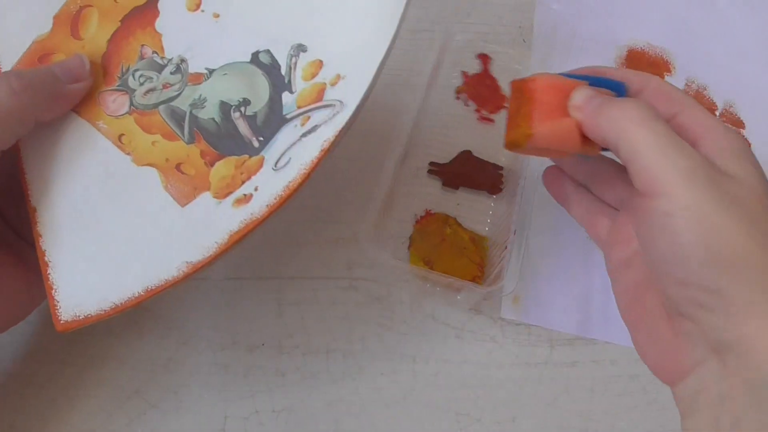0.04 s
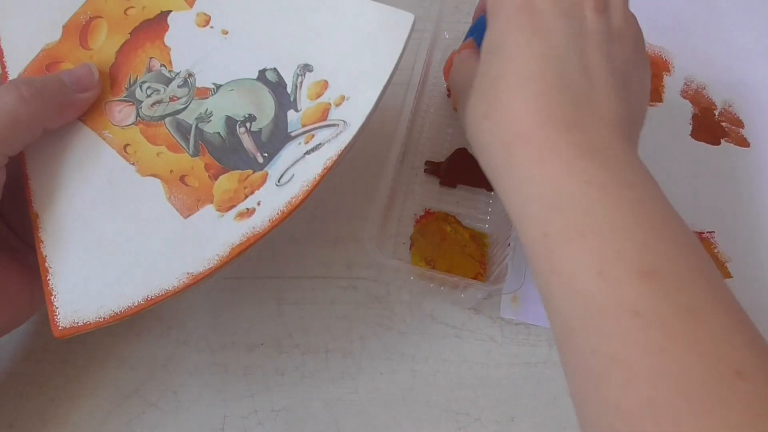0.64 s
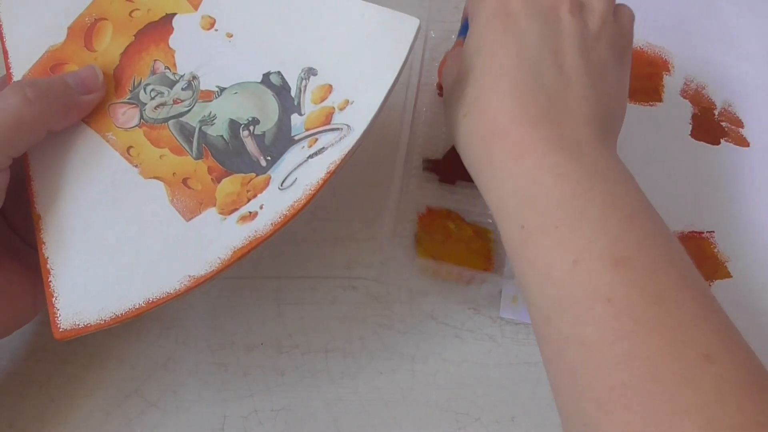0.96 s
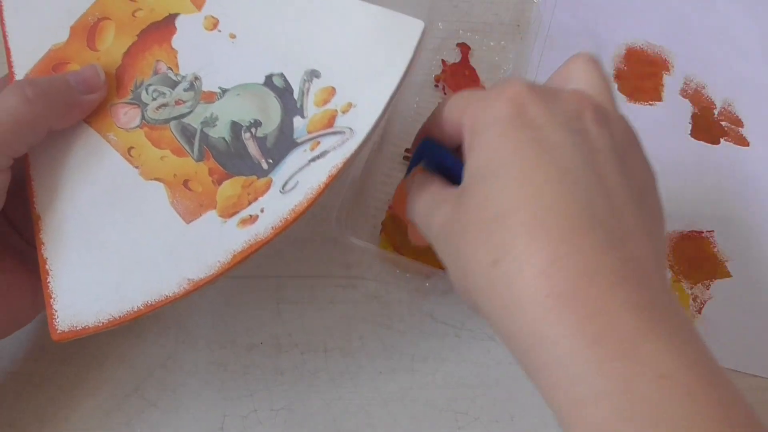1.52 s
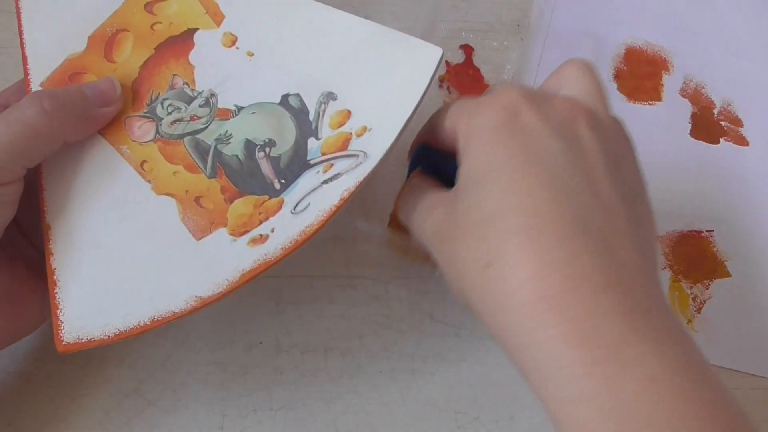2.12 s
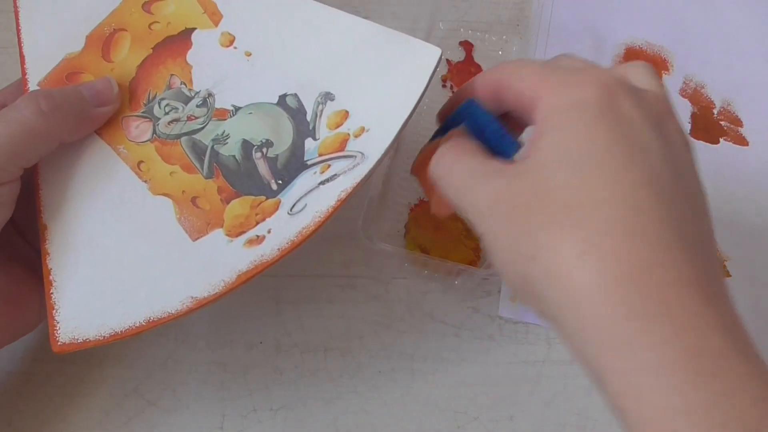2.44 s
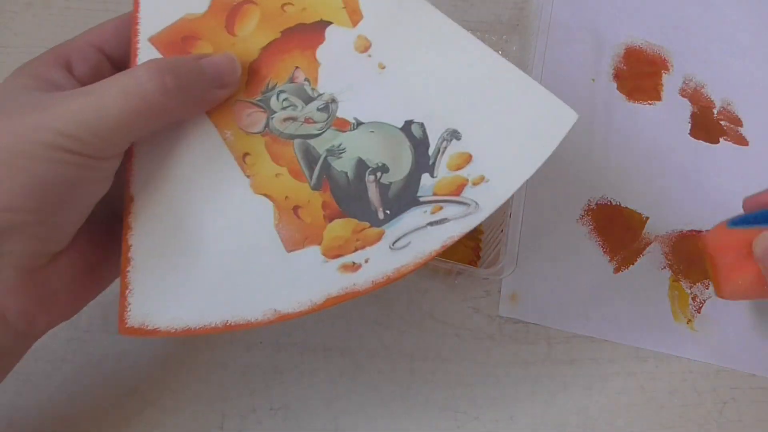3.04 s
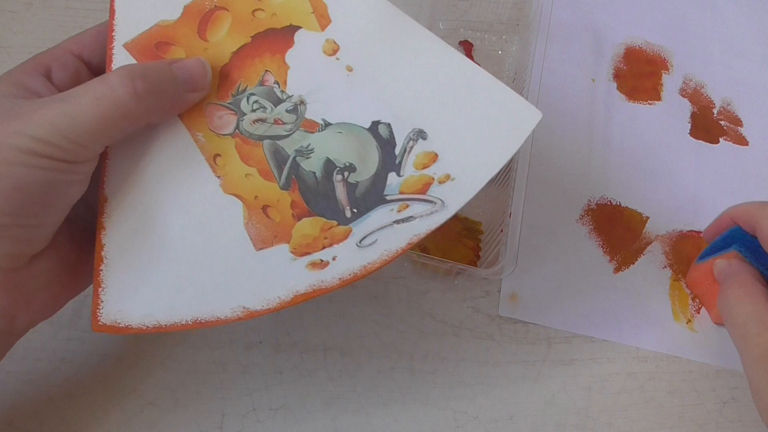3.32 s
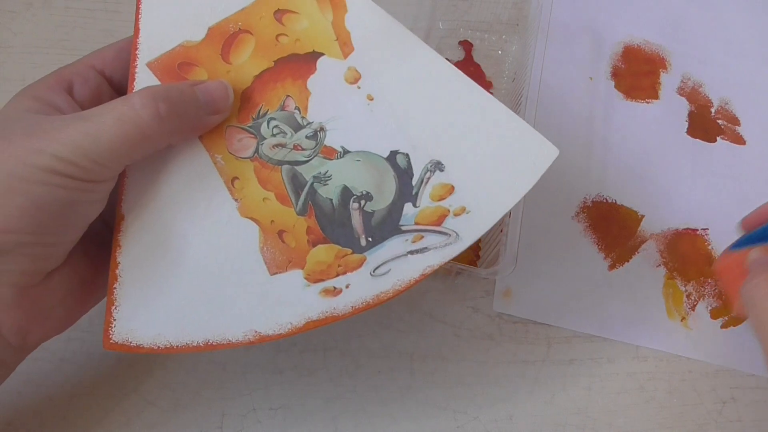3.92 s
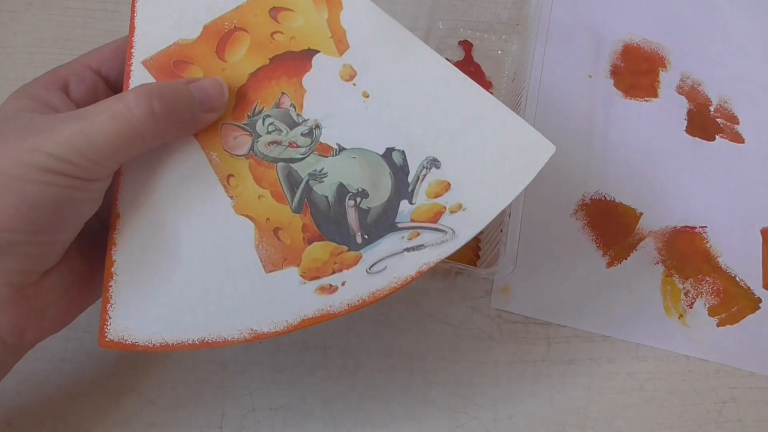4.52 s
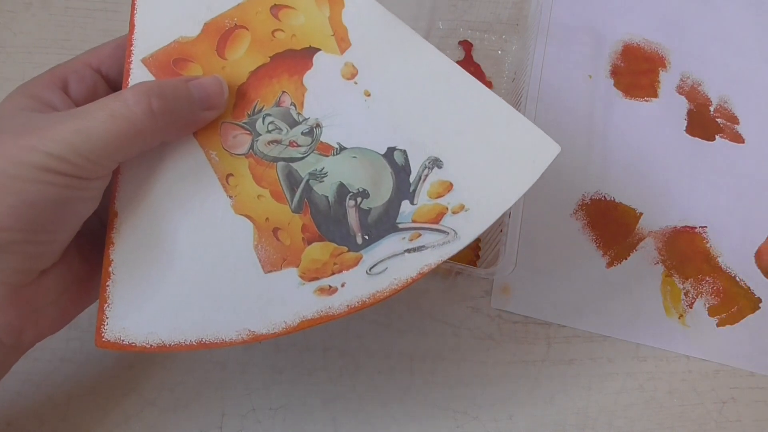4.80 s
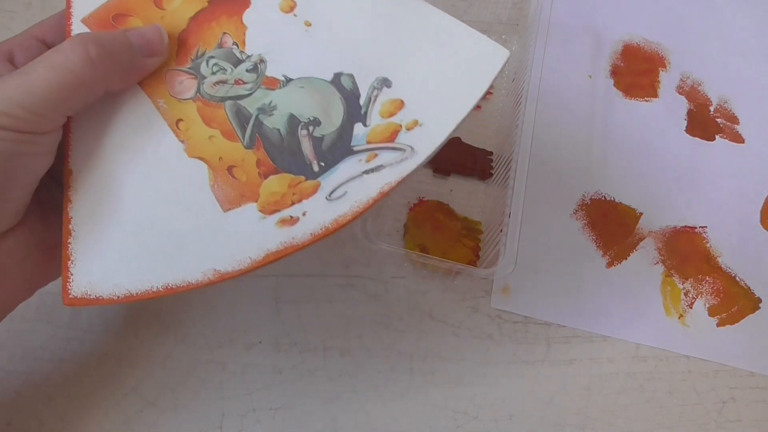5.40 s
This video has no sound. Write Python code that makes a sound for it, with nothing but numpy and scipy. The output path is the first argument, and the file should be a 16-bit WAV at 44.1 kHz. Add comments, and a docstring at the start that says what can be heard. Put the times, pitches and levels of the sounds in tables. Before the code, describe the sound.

Thin plastic crackles and knocks on a table as a sponge picks up paint, followed by faint dabs and wipes on paper.

```python
"""First a foam sponge picks up paint from a thin plastic tray on a table, its cells rustling at each press.
The sticky foam lifts the tray, which crackles and knocks back down, ringing in its normal modes.
Then the sponge is dabbed and wiped on a sheet of paper: the table thuds and threads of wet paint snap.
Throughout, a small room reverberates over a faint wavering hum; early on, a lens motor ticks."""
import sys
import numpy as np
from scipy import signal
from scipy.fft import rfft, irfft
from scipy.io import wavfile
from scipy.ndimage import uniform_filter1d

SR = 44100
rng = np.random.default_rng(int(sys.argv[2]) if len(sys.argv) > 2 else 0)


def bounce(signal):
    """Save signal as a 16-bit WAV file at the path given by the first command-line argument."""
    frames = np.transpose(np.atleast_2d(signal))
    limited = np.clip(frames, -1, 1)
    pcm = np.round(limited * 32767).astype(np.int16)
    wavfile.write(sys.argv[1], SR, pcm)


N = 245178
TIME = np.arange(N) / SR
EVENT_N = SR * 2 // 5
AGE = np.arange(EVENT_N) / SR  # time within one event


# The tray buckles or hits the table; the row at 1.704 s is a soft press that only sets the tray ringing, its
# crack near silent: # t/s, body level/dB, body centre f/Hz, crack level/dB, crack cutoff f/Hz, crack T60/s,
# rebound gain/dB
TRAY_KNOCKS = [(0.6233, -48, 200, -36, 12000, 0.027, -8), (0.6915, -40, 560, -34, 9000, 0.02, -2.5),
               (1.0297, -28.5, 560, -27, 12000, 0.036, -22),
               (1.0485, -30.5, 830, -21.5, 8000, 0.022, -26.5),
               (1.109, -24.5, 930, -15.5, 5260, 0.023, -16.5), (1.19, -31.5, 830, -35.5, 6000, 0.066, -16),
               (1.2227, -21.5, 850, -23.5, 11200, 0.039, -15.5), (1.2603, -30, 750, -29, 7700, 0.044, -11),
               (1.704, -38.5, 557, -60, 9000, .05, -20), (1.925, -28, 770, -31, 12400, 0.074, -9.5),
               (2.107, -31, 760, -30.5, 12100, 0.068, -1.5), (2.3512, -21.5, 960, -16, 13000, 0.027, -12),
               (2.363, -24, 1010, -28, 10000, 0.028, -11)]
# Normal modes of the tray on the table: f/Hz, relative level/dB, T60/s
TRAY_RESONANCES = [(189, -15, 0.13), (222.6, -1.5, 0.44), (416, -5.5, 0.35), (486.6, -5.5, 0.21),
                   (577.5, -0.5, 0.22), (605, -6, 0.32), (663, -8, 0.29), (720.4, -0.5, 0.23),
                   (750.7, -10.5, .22), (774, -1, 0.23), (839, -7, 0.22), (921, -5.5, 0.1),
                   (998, -15.5, 0.16), (1032, 1, 0.13), (1087, -9, 0.4), (1190, -8.5, 0.3),
                   (1200, -9.5, 0.34), (1284, -4.5, 0.23), (1350, -20.5, 0.21), (1386, -3, 0.23),
                   (1446, -5.5, 0.28)]
# Spectra of a surface's densely overlapping modes and of the crack: f/Hz, relative level/dB
BODY_SPECTRUM = [(30, -36.5), (90, -26), (135, -19), (230, -9.5), (300, -10.5), (480, -1.5), (750, -3.5),
                 (1400, -2), (1750, -14), (2400, -16), (4000, -20), (7000, -40.5), (16000, -46)]
CRACK_SPECTRUM = [(60, -21), (200, -24.5), (800, 6.5), (1400, -12), (2000, 1), (2700, -4.5), (3600, 4),
                  (5200, 3.5), (6600, -0.5), (8800, 5.5), (10500, -0.5), (13000, 2), (16000, -32.5)]

def tray_knocks(rebound_s=0.018, buckle_s=0.00044, swell_s=0.00082, room_t60=0.29, falloff_db=7.5):
    """Impulse excitation: each knock and rebound gives a crack, its dull echo and the tray's ringing."""
    out = np.zeros((2, N))
    for start, body_db, centre_hz, crack_db, top_hz, t60, rebound_db in TRAY_KNOCKS:
        for delay, gain_db in [(0, 0), (rebound_s, rebound_db)]:
            crack = colour(noise(EVENT_N, side_db=-10.5), CRACK_SPECTRUM, top_hz=top_hz)
            crack *= attack_decay(buckle_s, t60)
            echo = noise(EVENT_N, side_db=-2, grain_db=3.5)
            echo = colour(echo, CRACK_SPECTRUM, tilt_db=-3.4, top_hz=top_hz) * fade(AGE, room_t60)
            snap = crack + undb(-4) * np.sqrt(t60 / room_t60) * echo
            # The place of contact favours the modes near one frequency.
            modes = [(hz, db - falloff_db * abs(np.log2(hz / centre_hz)), decay)
                     for hz, db, decay in TRAY_RESONANCES]
            dense = colour(noise(EVENT_N, side_db=-6), BODY_SPECTRUM) * fade(AGE, t60=0.3)
            body = (undb(-1) * modal_response(modes) + undb(-4.5) * dense) * (1 - np.exp(-AGE / swell_s))
            add(out, start + delay, undb(gain_db) * (undb(crack_db) * snap + undb(body_db) * body))
    return out


def foam_rustle(strokes, spectrum, modes, side_db, grain_db, modes_db, dense_db):
    """Forced vibration: foam cells slip and rustle under pressure, driving the surface below."""
    out = np.zeros((2, N))
    surface = modal_response(modes, scatter_db=-1)
    for crest, rise, t60, rustle_db, tilt_db, body_db in strokes:
        slips = attack_decay(rise, t60) * undb(2.5 * wander(EVENT_N, rate_hz=320))
        cells = slips * colour(noise(EVENT_N, side_db, grain_db), spectrum, tilt_db)
        force = slips * colour(noise(EVENT_N, side_db, grain_db), BODY_SPECTRUM)
        ringing = signal.fftconvolve(force.mean(axis=0, keepdims=True), surface, axes=1)[:, :EVENT_N]
        body = undb(dense_db) * force + undb(modes_db) * np.std(force) * unit(ringing)
        add(out, crest - rise, undb(rustle_db) * cells + undb(body_db) * body)
    return out


# The foam is squeezed in the tray:
# crest t/s, rise time/s, T60/s, rustle level/dB, tilt/(dB/octave), body level/dB, peel level/dB
TRAY_PRESSES = [(0.1245, 0.0031, 0.19, -42.5, 1, -44, -73), (0.15, .02, 0.24, -34, -1, -41.5, -63),
                (0.655, 0.024, 0.25, -49.5, -2.5, -48.5, -62), (0.70, .02, 0.18, -45, -4.5, -48, -59),
                (0.92, 0.015, 0.16, -42.5, 1.5, -46.5, -50), (0.963, .025, 0.073, -47.5, -3.5, -45, -42),
                (1.165, 0.021, 0.32, -53, 7, -36.5, -58.5), (1.558, 0.023, 0.66, -63.5, -0.5, -55, -56),
                (1.706, 0.024, .14, -41, -3, -43.5, -50), (1.932, 0.013, 0.12, -34, -3, -30, -51.5),
                (2.116, 0.015, 0.078, -35, -3, -31, -45.5), (2.248, 0.025, 0.3, -53, -2, -57, -54.5)]

def tray_presses(peel_delay_s=0.089, peel_rise_s=0.028, peel_t60=0.33, peel_tilt_db=-0.7):
    """Adhesion: after each press into the paint, the foam rustles again as it peels away."""
    strokes = []
    for crest, rise, t60, rustle_db, tilt_db, body_db, peel_db in TRAY_PRESSES:
        strokes.append((crest, rise, t60, rustle_db, tilt_db, body_db))
        strokes.append((crest + peel_delay_s, peel_rise_s, peel_t60, peel_db, peel_tilt_db, peel_db + 1.5))
    return foam_on_tray(strokes)


# Spectrum of foam rustling in the tray: f/Hz, relative level/dB
FOAM_SPECTRUM = [(60, -24), (200, -9), (1200, -14), (2000, -5), (2700, -9.5), (3800, 0), (5200, -1),
                 (6600, -2), (9000, -0.5), (10500, -4), (13000, -5.5), (16000, -26)]

def foam_on_tray(strokes):
    """Sounding-board action: the thin tray radiates the slips of the foam."""
    return foam_rustle(strokes, FOAM_SPECTRUM, TRAY_RESONANCES,
                       side_db=-9, grain_db=2.5, modes_db=-8, dense_db=-4.5)


# Hand or foam lands on the paper:
# crest t/s, rise time/s, T60/s, rustle level/dB, tilt/(dB/octave), thud level/dB
PAPER_DABS = [(3.263, 0.0034, 0.21, -64, -18, -43), (3.364, 0.0022, 0.17, -59, 1, -55),
              (3.422, 0.049, 0.2, -57, 2.5, -68), (3.496, .007, 0.19, -44, -1, -45),
              (3.74, 0.0079, 0.16, -55.5, 3.5, -65.5), (3.807, 0.0071, 0.17, -50.5, 4.5, -62),
              (3.95, 0.0036, 0.1, -57.5, 4.5, -81), (4.025, 0.032, 0.086, -52.5, 4, -80),
              (4.147, .007, 0.15, -56, 5, -59.5), (4.225, 0.014, 0.12, -50, 5.5, -71),
              (4.302, 0.0074, 0.092, -48.5, 3.5, -53.5), (4.352, .009, 0.043, -62, 7, -55.5),
              (4.441, 0.0036, 0.095, -60, 1, -59), (4.477, 0.007, .056, -42.5, -1, -40.5),
              (4.764, 0.0067, 0.028, -51, -4.5, -59), (5.381, 0.0055, 0.22, -55.5, -3, -48),
              (5.408, .026, 0.13, -49, -1, -50.5)]
# Spectrum of foam on paper: f/Hz, relative level/dB
PAPER_SPECTRUM = [(200, -33), (1200, -3.5), (2500, -4), (3800, 1), (6000, -2), (9000, -2), (11000, -5.5),
                  (13000, -7), (16000, -42)]
# Normal modes of the table top: f/Hz, relative level/dB, T60/s
TABLE_RESONANCES = [(161, -18, 0.059), (252, 5, 0.064), (426, 2, 0.034), (544, -8.5, 0.032),
                    (763, 13.5, 0.01), (930, -2, 0.033), (1200, -1, 0.014)]

def paper_dabs():
    """Damping: the table's modes die quickly, so each dab is a rustle over a thud."""
    return foam_rustle(PAPER_DABS, PAPER_SPECTRUM, TABLE_RESONANCES,
                       side_db=-3, grain_db=3, modes_db=-3.5, dense_db=-8.5)


# Envelope of the foam rubbing along the paper: t/s, level/dB
WIPE_ENVELOPE = [(4.33, -71), (4.46, -65), (4.5, -54.5), (4.585, -67.5), (4.655, -60), (4.745, -54.5),
                 (4.79, -69.5), (4.86, -60.5), (4.93, -71), (5.03, -58), (5.14, -65), (5.185, -78),
                 (5.25, -60.5), (5.35, -83)]

def paper_wipe():
    """Stick-slip friction: foam cells catch on the paper and faintly shake the table."""
    times, db = np.transpose(WIPE_ENVELOPE)
    touching = (TIME > times[0]) * (TIME < times[-1])
    slips = touching * undb(np.interp(TIME, times, db) + 2.5 * wander(N, rate_hz=320))
    cells = colour(noise(N, side_db=-1.5, grain_db=3.5), PAPER_SPECTRUM, tilt_db=2)
    table = colour(noise(N, side_db=-6), BODY_SPECTRUM)
    return slips * (cells + undb(-11.5) * table)


# Threads of wet paint break: t/s, level/dB, centre f/Hz
PAINT_SNAPS = [(1.7376, -41, 9300), (2.0716, -45, 7000), (2.145, -46.5, 8000), (3.523, -40.5, 10400),
               (3.739, -50.5, 7200), (4.216, -35, 10750), (4.226, -38, 10900), (4.4225, -46, 8900),
               (4.468, -41, 9500), (4.4792, -26.5, 8900)]

def paint_snaps(fine_count=4, fine_hz=9000):
    """Rupture under tension: paint threads part with bright ticks, the finer ones at random."""
    out = np.zeros((2, N))
    fine = [(rng.uniform(4.32, 4.45), rng.uniform(-53, -47), fine_hz) for _ in range(fine_count)]
    for start, db, hz in PAINT_SNAPS + fine:
        band = resonate(noise(EVENT_N, side_db=-1), hz, width_hz=3600)
        add(out, start, undb(db) * band * fade(AGE, t60=0.013))
    return out


def room(x, wet_db=-12.5, low_t60=0.38, high_t60=0.075, split_hz=5500, gap_s=0.0048):
    """Reverberation: a small room adds a diffuse tail whose treble dies first."""
    scatter = noise(EVENT_N, side_db=-3, grain_db=-1)
    low = signal.sosfilt(signal.butter(2, split_hz, fs=SR, output="sos"), scatter)
    tail = (low * fade(AGE, low_t60) + (scatter - low) * fade(AGE, high_t60)) * (AGE > gap_s)
    tail = unit(tail) / np.sqrt(EVENT_N)
    return x + undb(wet_db) * signal.fftconvolve(x, tail, axes=1)[:, :N]


# Runs of the lens motor: start t/s, end t/s, level/dB
MOTOR_RUNS = [(0.007, 0.1, -61), (0.346, 0.54, -62.5), (2.666, 2.84, -62)]

def lens_motor(step_hz=50, t60=0.023):
    """Periodic excitation: each motor step is a faint, decaying tick of band noise."""
    steps = np.zeros(N)
    for start, end, db in MOTOR_RUNS:
        running = (TIME >= start) * (TIME < end)
        steps += undb(db) * running * fade((TIME - start) % (1 / step_hz), t60)
    return steps * resonate(noise(N, side_db=-1), hz=2750, width_hz=1600)


# Envelopes of the hum and the drone: t/s, level/dB
HUM_ENVELOPE = [(0, -72), (.25, -63.5), (.5, -72), (1.5, -69), (2.75, -65.5), (3.05, -74.5), (3.4, -59.5),
                (3.8, -74.5), (4.2, -63.5), (4.8, -71.5), (5.25, -63.5), (5.56, -73)]
DRONE_ENVELOPE = [(0, -59.5), (.4, -78), (1.1, -73), (1.42, -59), (1.9, -71.5), (3.05, -79.5), (3.2, -60),
                  (3.55, -65.5), (3.8, -77.5), (5.2, -82), (5.4, -59), (5.56, -62.5)]
# Spectrum of the room air: f/Hz, relative level/dB
AIR_SPECTRUM = [(25, 18), (60, 4), (130, 8.5), (195, 9), (280, 5.5), (600, 1.5), (1200, -3), (1420, 4),
                (1570, 2.5), (1750, -10.5), (2500, -7.5), (6200, -13.5), (11000, -7), (16000, -16.5)]

def background():
    """Amplitude modulation: a narrow hum and a broader drone swell and sink over the room air."""
    hum = envelope(HUM_ENVELOPE) * resonate(noise(N, side_db=-5), hz=246.4, width_hz=7.2)
    drone = envelope(DRONE_ENVELOPE) * resonate(noise(N, side_db=-6), hz=324, width_hz=128)
    air = undb(-60.5 + 0.49 * wander(N, rate_hz=18)) * colour(noise(N, side_db=-0.5), AIR_SPECTRUM)
    return hum + drone + air


def modal_response(modes, scatter_db=4.1, port_phase_rad=0.068):
    """Modal superposition: damped sinusoids of random weight and phase, summed for each channel."""
    hz, db, t60 = np.transpose(modes)[:, :, None]
    weight, phase, lag = rng.standard_normal((3, len(hz), 1))
    gain = undb(db + scatter_db * weight)
    swing = gain * fade(AGE, t60) / np.sqrt(np.sum(gain ** 2) / 2)
    angle = 2 * np.pi * hz * AGE + np.pi * phase
    return np.array([np.sum(swing * np.sin(angle + ear * port_phase_rad * lag), axis=0) for ear in (1, -1)])


def noise(size, side_db, grain_db=0):
    """Mid-side noise: side_db sets the width; grain_db lets single grains stand out."""
    mid, side = rng.standard_normal((2, size))
    grains = undb(grain_db * np.minimum(rng.exponential(size=size), 6))
    return unit(grains * (mid + undb(side_db) * side * np.array([[1], [-1]])))


def colour(x, spectrum, tilt_db=0, top_hz=np.inf):
    """Spectral shaping by a curve, a tilt per octave and a soft cutoff; rms 1."""
    hz = bins(x)
    knots, db = np.transpose(spectrum)
    gain = undb(np.interp(np.log(hz), np.log(knots), db) + tilt_db * np.log2(hz))
    gain /= np.hypot(1, (hz / top_hz) ** 3)
    return unit(irfft(rfft(x) * gain, x.shape[-1]))


def resonate(x, hz, width_hz):
    """Resonance: x passes twice through one band-pass; rms 1."""
    f = bins(x)
    detuning = (f * f - hz * hz) / (f * width_hz)
    return unit(irfft(rfft(x) / (1 + detuning ** 2), x.shape[-1]))


def wander(size, rate_hz):
    """Smoothed random steps of spread near 1."""
    hold = int(SR / rate_hz)
    steps = np.repeat(rng.standard_normal(size // hold + 1), hold)
    return uniform_filter1d(steps[:size], hold)


def envelope(points):
    """Gain over the scene, interpolated in decibels."""
    return undb(np.interp(TIME, *np.transpose(points)))


def attack_decay(rise_s, t60):
    """Linear rise, then exponential decay."""
    return np.minimum(AGE / rise_s, 1) * fade(AGE - rise_s, t60)


def fade(t, t60):
    """Exponential decay, 60 dB down after t60."""
    return np.exp(-np.log(1000) * np.maximum(t, 0) / t60)


def add(track, start_s, sound):
    """Superposition of a sound on a track."""
    start = int(start_s * SR)
    part = sound[:, :N - start]
    track[:, start:start + part.shape[1]] += part


def bins(x):
    """Fourier frequencies of x, at least 1 Hz."""
    return np.maximum(np.fft.rfftfreq(x.shape[-1], 1 / SR), 1)


def undb(db):
    """Level to amplitude ratio."""
    return 10 ** (np.asarray(db) / 20)


def unit(x):
    """Normalisation to rms 1."""
    return x / np.sqrt(np.mean(x ** 2))


def scene():
    """Superposition of all sources; the paper sounds wider than the tray."""
    presses, dabs = tray_presses(), paper_dabs()
    tray = tray_knocks() + room(presses)
    paper = room(dabs + paper_wipe() + paint_snaps())
    return tray + paper + lens_motor() + background()


# Difference between the two microphone ports: f/Hz, side gain/dB
PORT_DIFFERENCE = [(60, 5.5), (130, -1), (240, 0.5), (600, 2.5), (1300, 1), (2500, -3.5), (4600, -5),
                   (8500, 3), (12000, 1)]

def record(dry, low_cut_hz=110, top_hz=16000):
    """Mid-side filtering: two close ports colour the width; band limiting cuts rumble and top."""
    knots, db = np.transpose(PORT_DIFFERENCE)
    mid, side = (dry[0] + dry[1]) / 2, (dry[0] - dry[1]) / 2
    side_gain = undb(np.interp(np.log(bins(side)), np.log(knots), db))
    side = irfft(rfft(side) * side_gain, N)
    highpass = signal.butter(2, low_cut_hz, "high", fs=SR, output="sos")
    lowpass = signal.ellip(10, 0.2, 80, top_hz, fs=SR, output="sos")
    return signal.sosfilt(lowpass, signal.sosfilt(highpass, [mid + side, mid - side]))


dry = scene()
out = record(dry)
bounce(out)
```